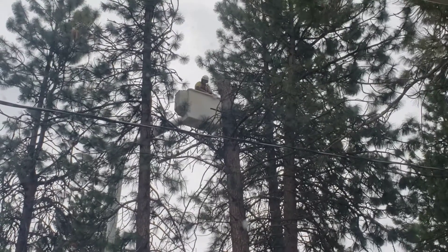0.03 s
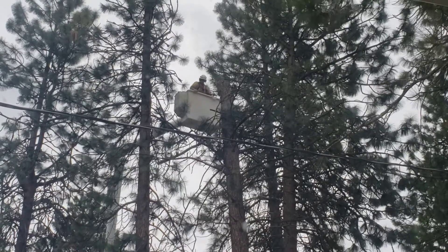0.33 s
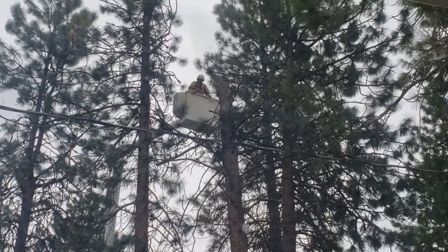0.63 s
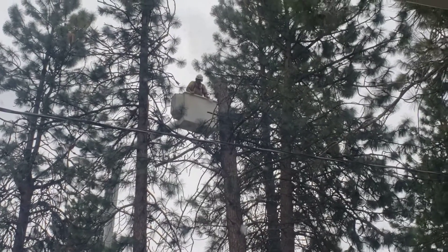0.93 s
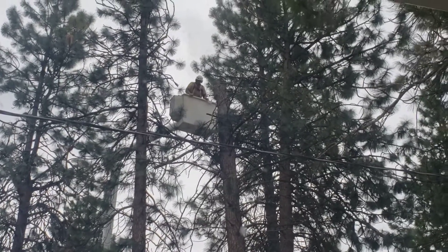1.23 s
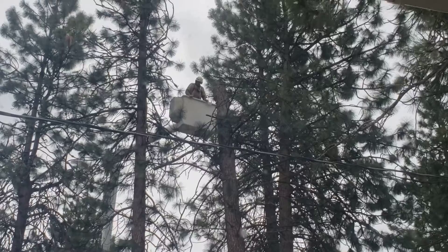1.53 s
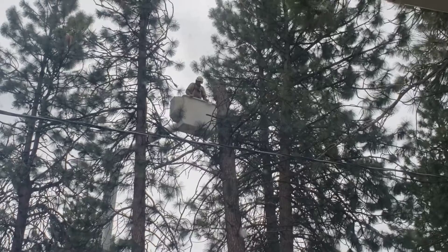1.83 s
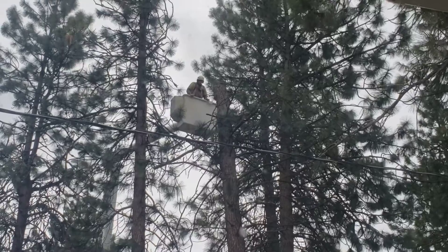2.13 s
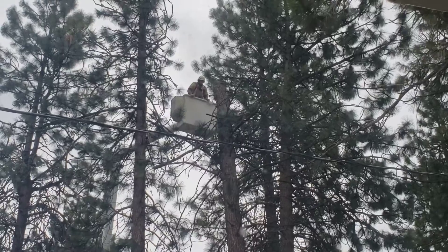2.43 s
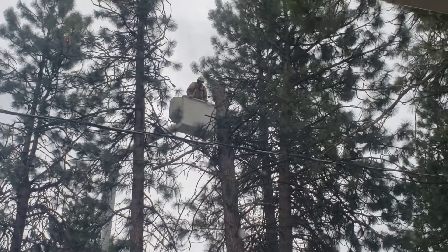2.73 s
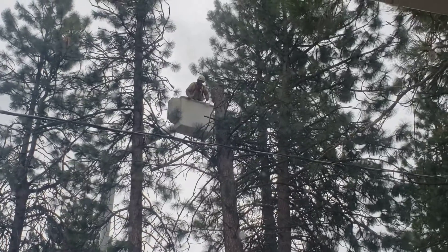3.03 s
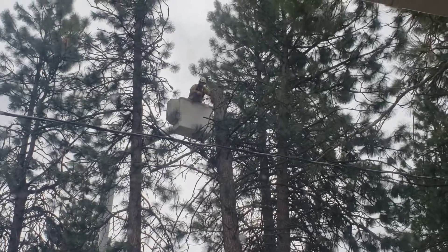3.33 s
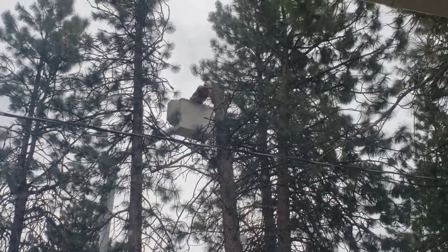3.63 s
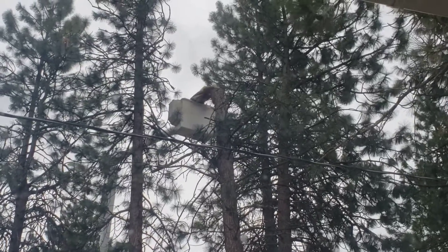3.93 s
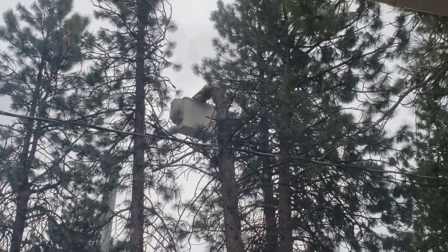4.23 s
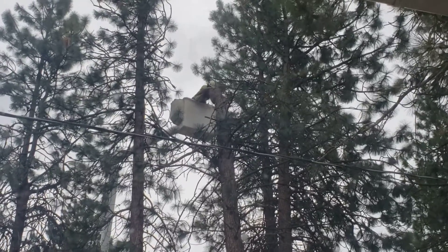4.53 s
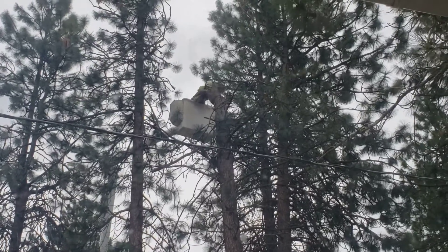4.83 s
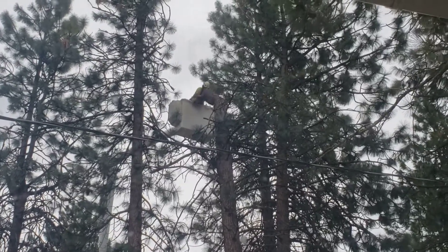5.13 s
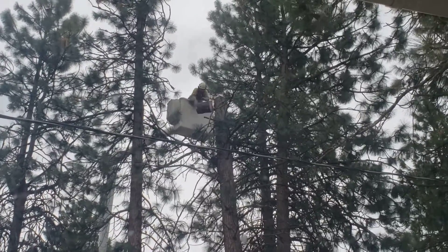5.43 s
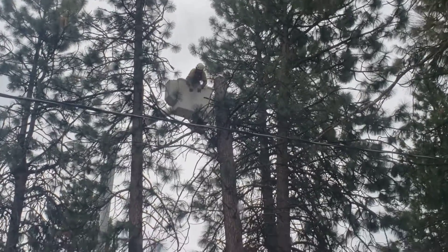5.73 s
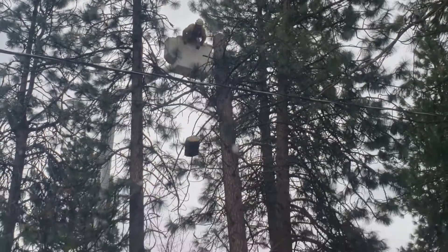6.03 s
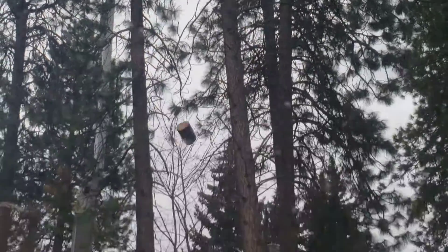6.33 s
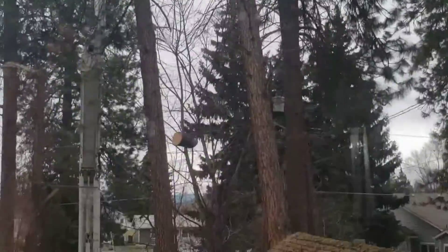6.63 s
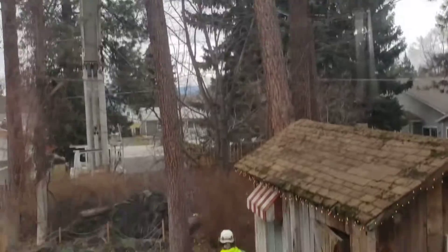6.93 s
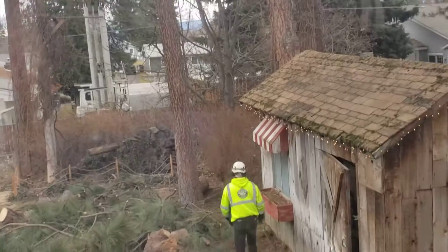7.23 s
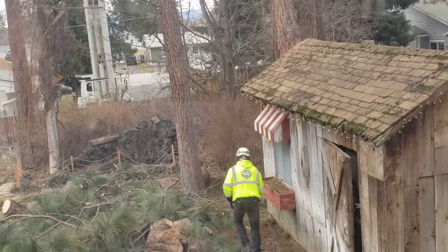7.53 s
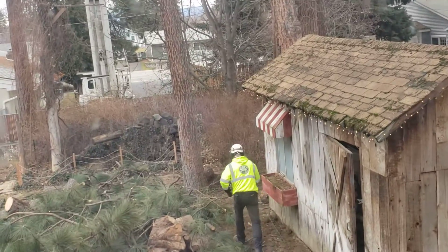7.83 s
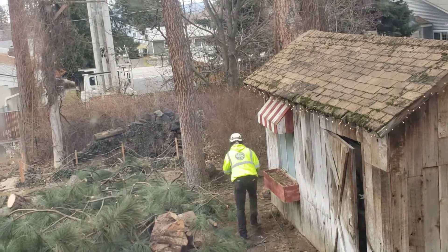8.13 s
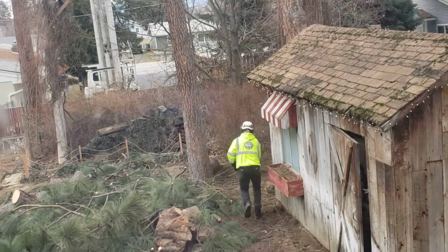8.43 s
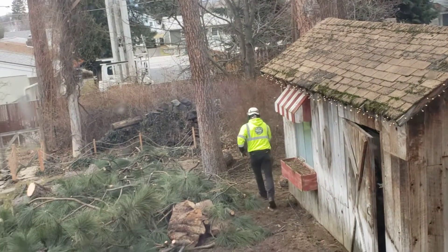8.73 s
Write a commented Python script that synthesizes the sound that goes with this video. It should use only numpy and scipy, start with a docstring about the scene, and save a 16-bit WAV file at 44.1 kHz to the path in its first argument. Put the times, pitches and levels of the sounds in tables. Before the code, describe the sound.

From the start, a bucket lift's engine drones in the distance, a low, gently throbbing rumble that continues throughout. Close by there is steady microphone hiss, a little stronger on the left, and a faint soft tick once a second, like a clock across a room. Dull handling scuffs come at about 0.3 seconds and a few times between 4 and 6.5 seconds. From about 4 seconds a second engine swells behind the first, strongest around 6 to 7 seconds. Just after 7 seconds a cut log lands with a wooden knock and a deep thud, the loudest event, settling quickly and echoing round the yard for about a second. A small dry crack within a short rustle follows at 7.4 seconds. At about 8.5 seconds a finger slides with a faint, high squeak beside the right microphone, while the engines drone on until nearly 9 seconds.

```python
"""Tree work heard from the shelter of a house. From the start a bucket lift's engine drones far off,
while close by are microphone hiss, a faint tick once a second and now and then a handling scuff.
From 4 s a second engine swells behind the lift. Just after 7 s a cut log lands: the modes of wood and
ground give a knock and a deep thud that echoes round the yard, and something cracks just after it.
Last, a finger slides and squeaks beside the right microphone."""
import sys
import numpy as np
from scipy import signal
from scipy.fft import rfft, irfft, next_fast_len
from scipy.io import wavfile

SR = 44100
rng = np.random.default_rng(int(sys.argv[2]) if len(sys.argv) > 2 else 0)


def persist_wave(psi):
    """Save psi, clipped to +-1, as 16-bit WAV."""
    counts = np.round(np.clip(psi, -1, 1) * 32767).astype(np.int16)
    wavfile.write(sys.argv[1], SR, np.atleast_2d(counts).T)


N = 391608
TIME = np.arange(N) / SR

# load on the second engine: (time [s], level [dB], boost of the even harmonics [dB])
ENGINE_LOAD = [(0, -22, 0), (3.9, -21.5, 0), (4.7, -6.5, -7), (5.8, -4.5, -10), (6.1, 1.5, -11.5),
               (6.5, -4, -4.5), (7.0, 1, -8.5), (7.8, -7.5, 4), (8.88, -4.5, 8)]


def from_db(db):
    """Amplitude ratio: a factor of ten per 20 dB."""
    return 10 ** (np.asarray(db) / 20)


def in_time(rows):
    """Linear interpolation of each column over time."""
    times, *columns = np.transpose(rows)
    return [np.interp(TIME, times, column) for column in columns]


def at_hz(points, hz):
    """Interpolation on a log-frequency axis."""
    known_hz, values = np.transpose(points)
    return np.interp(np.log(hz + 1e-9), np.log(known_hz), values)


def pan(left_db):
    """Direction by level difference: channel gains for a left-minus-right level."""
    return from_db(np.array([[left_db], [-left_db]]) / 2)


def drift(rate_hz):
    """Low-passed noise: a slow wander of unit standard deviation."""
    hop = 100  # samples per step
    pole = np.exp(-2 * np.pi * rate_hz * hop / SR)
    white = rng.standard_normal(N // hop + 1002)
    slow = signal.lfilter([1], [1, -2 * pole, pole * pole], white)[1000:]  # once settled
    return np.interp(np.arange(N) / hop, np.arange(len(slow)), slow / slow.std())


def noise(spectrum, outdoors=False):
    """Stereo noise of a given spectral density; outdoors, long waves reach both microphones coherently."""
    # likeness of the two channels: (frequency [Hz], correlation [1])
    coherence = [(30, .98), (70, 0.9), (130, 1), (250, 0.81), (500, .6), (1000, 0.27), (4000, 0.061)]
    size = next_fast_len(N, real=True)
    hz = np.arange(size // 2 + 1) * SR / size
    alike = np.clip(at_hz(coherence, hz), 0, 1) if outdoors else 0
    mid, side = rfft(rng.standard_normal((2, size)))
    pair = np.sqrt(1 + alike) * mid + np.sqrt(1 - alike) * side * [[1], [-1]]
    return irfft(pair * from_db(at_hz(spectrum, hz)), size)[:, :N] * np.sqrt(SR) / 2


def burst(start, rise, t60):
    """Linear attack, then exponential decay by 60 dB in t60; all times in seconds."""
    age = TIME - start
    return np.clip(age / rise, 0, 1) * from_db(-60 * np.clip((age - rise) / t60, 0, 2))


def strike(times, blow_db, modes):
    """Modal superposition: impulses ring damped resonators, about a decibel differently each time."""
    ringing = np.zeros(N)
    for hz, level_db, t60 in modes:
        impulses = np.zeros(N)
        impulses[(times * SR).astype(int)] = from_db(blow_db + level_db + rng.standard_normal(len(times)))
        pole, angle = from_db(-60 / (t60 * SR)), 2 * np.pi * hz / SR
        feedback = [1, -2 * pole * np.cos(angle), pole * pole]
        ringing += signal.lfilter([0, np.sin(angle)], feedback, impulses + 1e-18)
    return ringing


def tone(hz, waver_hz, flutter_db):
    """Random modulation of an engine partial: its pitch hunts and the air makes its level flutter."""
    phase = 2 * np.pi * (np.cumsum(hz + waver_hz * drift(1.625)) / SR + rng.random())
    return np.sqrt(2) * np.sin(phase) * from_db(flutter_db * drift(3.3))


def falling_log():
    """Impact excites the modes of wood and ground; bark crunches and the yard reverberates."""
    # the log bites in, slams down and settles: (time [s], wood level [dB], ground level [dB])
    blows = [(7.131, -53, -37.5), (7.143, -48.5, -41), (7.161, -53, -38), (7.173, -50, -29),
             (7.191, -57, -37.5), (7.219, -68, -33.5), (7.277, -69.5, -34.5), (7.344, -74, -44.5),
             (7.421, -75, -45.5)]
    # modes of each body: (frequency [Hz], level [dB], t60 [s])
    wood_modes = [(214, -10, 0.18), (272.3, -11.5, 0.43), (347.5, -0.5, 0.15), (540, -25.5, .18),
                  (589, -9, 0.21), (627, -19.5, 0.2), (790, -39, 0.17), (1013, -30, .25), (1120, -25, 0.29)]
    ground_modes = [(40.86, -6, 0.55), (59.3, 5.5, 0.25), (90.8, -4.5, 0.15)]
    # spectra of the crunch and the low tail: (frequency [Hz], density [dB/Hz])
    bark_spectrum = [(60, -83.5), (150, -67.5), (350, -81), (480, -88.5), (650, -91), (850, -105),
                     (1150, -104), (1500, -119), (4000, -130)]
    tail_spectrum = [(15, -88), (28, -67.5), (42, -44.5), (65, -45), (100, -71.5), (150, -83), (300, -83),
                     (600, -110), (1500, -135)]
    times, wood_db, ground_db = np.transpose(blows)
    # the trunk meets soft ground, so its ring has no sharp edge
    wood = signal.sosfilt(signal.butter(4, 950, fs=SR, output="sos"), strike(times, wood_db, wood_modes))
    # earth makes a long contact, which leaves only the bass
    ground = strike(times, ground_db, ground_modes)
    boom = signal.sosfilt(signal.butter(2, 170, fs=SR, output="sos"), ground)
    crunch = burst(7.124, rise=0.06, t60=0.34) * noise(bark_spectrum, outdoors=True)
    tail = burst(7.16, rise=0.049, t60=1.1) * noise(tail_spectrum, outdoors=True) * from_db(-8)
    return wood * pan(-1.2) + boom * pan(1.2) + crunch + tail * pan(1.3)


def crack():
    """A dry crack inside a short rustle; as incoherent sounds they add in power."""
    # spectrum of both: (frequency [Hz], density [dB/Hz])
    spectrum = [(900, -130), (2000, -108), (2800, -100), (4500, -104), (5800, -113), (8500, -114),
                (10500, -124), (15000, -130)]
    snap = from_db(-4) * burst(7.399, rise=.008, t60=.2)
    rustle = from_db(-14.5) * burst(7.29, rise=.09, t60=.4)
    return np.hypot(snap, rustle) * noise(spectrum) * pan(4.2)


def lift_engine():
    """Periodic firing at idle gives a tone that throbs by amplitude modulation, amid machinery tones."""
    # steady tones of the machinery: (frequency [Hz], level [dB])
    partials = [(120, -68), (172.5, -73), (178, -74), (199, -73), (203.5, -72.5), (213.5, -73),
                (240, -72.5), (326.5, -77.5), (397, -88.5), (427.5, -91)]
    firing_hz, firing_db, throb_db = 67.8, -57.5, 3.0
    throb_hz = 3.1 + 0.68 * drift(2)
    throb = np.sin(2 * np.pi * np.cumsum(throb_hz) / SR)
    firing = from_db(firing_db + throb_db * throb) * tone(firing_hz, waver_hz=.2, flutter_db=1.7)
    machinery = sum(from_db(db) * tone(hz, waver_hz=0.24, flutter_db=1.5) for hz, db in partials)
    return firing * pan(2.1) + machinery * pan(0.43)


def second_engine():
    """A harmonic series follows the firing rate, growing louder and then deeper in timbre."""
    # it speeds up and eases off: (time [s], firing rate [Hz])
    speed = [(0, 31.1), (4.1, 31.37), (4.7, 31.95), (5.55, 32.23), (6.0, 34.07), (6.55, 33.47), (7.3, 33.4),
             (8.05, 31.5), (8.88, 32)]
    # its partials: (multiple of the firing rate [1], level [dB])
    harmonics = [(2, -54), (3, -53), (4, -59.5)]
    load_db, even_db = in_time(ENGINE_LOAD)
    firing_hz, = in_time(speed)
    hum = np.zeros(N)
    for order, db in harmonics:
        gain = from_db(load_db + db + even_db * (order % 2 == 0))
        hum += gain * tone(order * firing_hz, waver_hz=.3, flutter_db=1.5)
    return hum * pan(1.1)


def exhaust_rumble():
    """Both exhausts blur into a continuous spectrum that rises a little with the second engine's load."""
    # spectrum of the exhausts: (frequency [Hz], density [dB/Hz])
    spectrum = [(15, -112), (27, -97), (35, -82), (50, -73), (60, -73), (80, -74.5), (115, -78.5),
                (150, -85), (210, -83), (270, -91), (350, -95), (450, -99), (560, -112), (670, -109),
                (780, -116), (1200, -121), (2500, -140)]
    load_db, _ = in_time(ENGINE_LOAD)
    level_db = 1.7 + .09 * load_db + 1.3 * drift(6)
    return from_db(level_db) * noise(spectrum, outdoors=True) * pan(0.9)


def ticking():
    """Noise bursts whose slow attack blurs them, like a clock across a room."""
    # one tick a second: (time [s], level [dB])
    ticks = [(.35, -5), (1.34, -3), (2.35, -6), (3.35, -2.5), (4.34, -4), (5.34, -4), (6.35, -2.5),
             (7.34, -9), (8.33, -5)]
    # spectrum of a tick: (frequency [Hz], density [dB/Hz])
    spectrum = [(800, -132), (2000, -117), (3200, -109), (4200, -111.5), (5500, -123), (9000, -128),
                (14000, -138)]
    envelope = sum(from_db(db) * burst(time - .033, rise=0.05, t60=0.27) for time, db in ticks)
    return envelope * noise(spectrum) * pan(2.5)


def handling():
    """Friction and contact noise: dull scuffs, a tiny tap, then a finger sliding on the housing."""
    # soft, nasal scuffs: (time [s], level [dB], centre frequency [Hz], rise [s])
    touches = [(.26, 2.5, 1330, 0.082), (4.1, -5, 1170, 0.2), (4.95, -8, 1180, 0.12),
               (5.88, -3.5, 1290, .11), (6.52, -6, 1390, 0.037)]
    # spectrum of a scuff: (multiple of the centre frequency [1], density [dB/Hz])
    scuff_shape = [(.3, -124), (.75, -117), (1, -101), (1.22, -118), (1.55, -116), (3, -132)]
    # spectra of the sliding finger: (frequency [Hz], density [dB/Hz])
    rub_spectrum = [(2000, -130), (4200, -114), (6000, -117), (9500, -114), (11200, -113), (13000, -111),
                    (16000, -115)]
    squeak_spectrum = [(9500, -140), (11200, -119), (12600, -102), (13800, -105), (15500, -122)]
    scuffs = sum(from_db(db) * burst(time, rise, t60=.35) * noise(np.array(scuff_shape) * [hz, 1])
                 for time, db, hz, rise in touches)
    slide_s = 8.505
    rub = from_db(-8.5) * burst(slide_s, rise=0.071, t60=8.7) * noise(rub_spectrum)
    squeak = from_db(-1) * burst(slide_s, rise=.085, t60=.4) * noise(squeak_spectrum)
    slide = (rub + squeak) * from_db(drift(70))
    tap_noise = noise([(7000, -130), (9500, -112), (12000, -103), (13200, -125)])
    tap = burst(6.435, rise=0.0014, t60=.025) * tap_noise
    return scuffs * pan(4.0) + (slide + tap) * pan(-4.5)


def microphone_hiss():
    """Self-noise: a steady broadband hiss on both sides and a narrower, wavering band on the left."""
    # spectra of the two hisses: (frequency [Hz], density [dB/Hz])
    broad_spectrum = [(100, -113), (600, -115), (1200, -118), (1800, -120), (3800, -122), (5500, -127),
                      (8500, -132), (10000, -129), (12000, -121.5), (16000, -121)]
    left_spectrum = [(500, -122), (1000, -117), (1550, -117), (1950, -110), (2200, -108), (2480, -100.5),
                     (2830, -101.5), (3050, -107.5), (3300, -111), (3550, -121), (5000, -129), (9000, -145)]
    # wavering of the left hiss: (time [s], level [dB])
    left_level = [(0.0, 0.7), (0.2, -1.2), (0.64, 2), (1.2, -1), (1.52, 2.1), (1.84, -2.5), (2.04, 1.2),
                  (3.36, -1.1), (3.72, 1.0), (3.92, -0.1), (5.76, -0.5), (6.0, 0.5), (6.44, -1.0), (6.6, 2),
                  (7.2, -0.8), (7.4, 4.5), (7.56, -0.5), (8.32, 2), (8.48, 0), (8.88, 3.5)]
    level_db, = in_time(left_level)
    left = noise(left_spectrum) * from_db(level_db - level_db.mean() + 0.68 * drift(9))
    return noise(broad_spectrum) + left * [[1], [0]]


def scene():
    """Linear superposition: the pressures of all sources add."""
    engines = lift_engine() + second_engine() + exhaust_rumble()
    return engines + falling_log() + crack() + ticking() + handling() + microphone_hiss()


def record(dry):
    """Band limiting: the recorder drops the deepest bass and cuts the top steeply."""
    low_hz, high_hz = 18, 15750
    lean = signal.sosfilt(signal.butter(2, low_hz, "high", fs=SR, output="sos"), dry)
    return signal.sosfilt(signal.ellip(12, .1, 80, high_hz, fs=SR, output="sos"), lean)


dry = scene()
out = record(dry)
persist_wave(out)
```